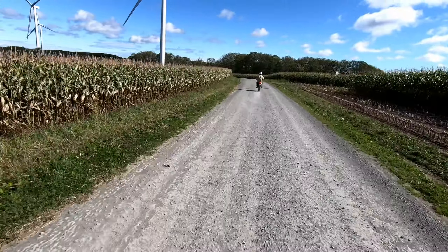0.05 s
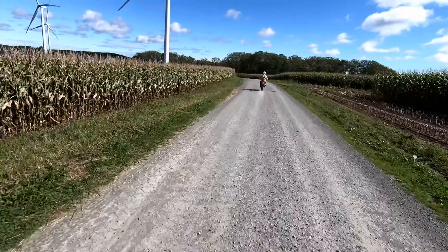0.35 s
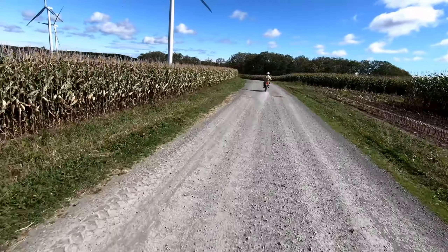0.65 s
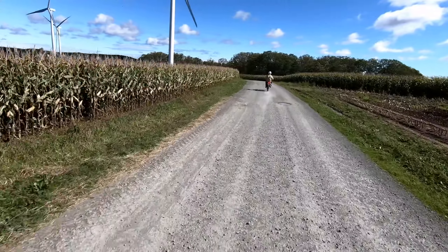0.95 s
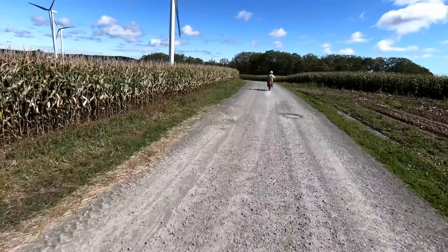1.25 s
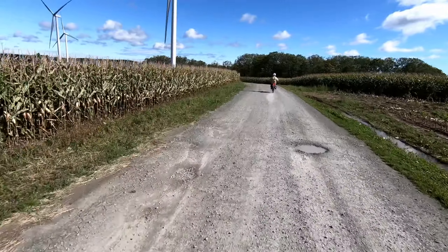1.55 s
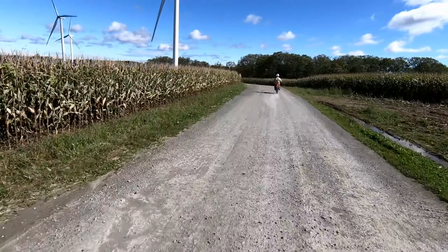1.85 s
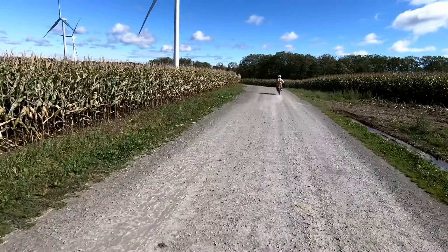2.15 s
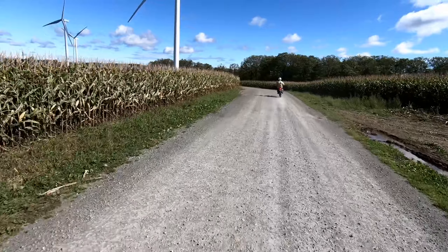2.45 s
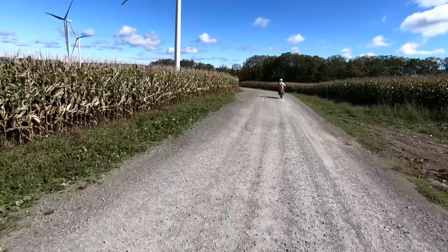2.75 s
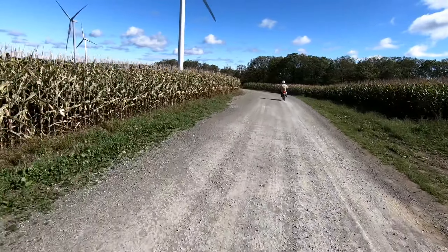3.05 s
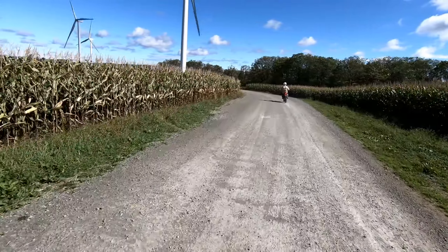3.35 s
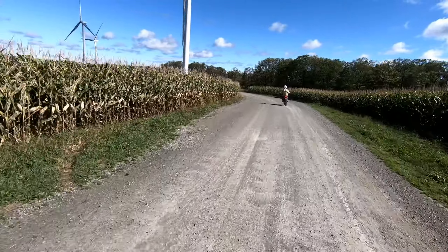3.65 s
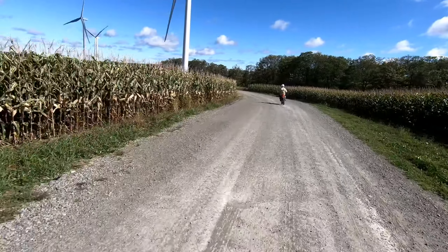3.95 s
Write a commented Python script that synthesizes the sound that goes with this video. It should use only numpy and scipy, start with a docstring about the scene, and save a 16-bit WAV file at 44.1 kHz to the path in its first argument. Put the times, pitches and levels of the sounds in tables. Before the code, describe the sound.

Wind rumbles and flutters on the microphone for all four seconds of a two-wheeler ride. Short rasping gusts and faint scratchy hisses crowd the first 1.3 seconds, then thin out. Underneath, tyres hum and crunch over gravel, softer after 3 seconds, and a faint drive whir sinks slightly in pitch. Loose parts knock briefly at about 1.2 seconds, twice around 2, and at 3.8.

```python
"""Wind rumbles and flutters on the microphone during a two-wheeler ride along a gravel road.
Big swirls of air make the rumble; small ones (eddies) rasp briefly and thin out as the wind eases.
Underneath, the tyres hum and hiss over the gravel, bumps make loose parts knock and the drive
whirs faintly. Faint, short bursts of scratchy hiss come and go."""
import sys
import numpy as np
from scipy import signal
from scipy.fft import rfft, irfft
from scipy.io import wavfile
from scipy.ndimage import uniform_filter1d, minimum_filter1d

SR = 44100
rng = np.random.default_rng(int(sys.argv[2]) if len(sys.argv) > 2 else 0)


def unload_wav(signal):
    """Save mono or channel-first audio to the path in sys.argv[1] as 16-bit WAV at rate SR, clipped to [-1, 1]."""
    wavfile.write(
        sys.argv[1],
        SR,
        np.round(np.clip(np.atleast_2d(signal).T, -1, 1) * 32767).astype(np.int16),
    )


N = 176400
T = np.arange(N) / SR


# How the deep rumble, low buffeting and higher flutter rise and fall (time [s], level [dB])
RUMBLE_LEVELS = [(0.0, -24.5), (0.12, -18.5), (1.36, -20.5), (1.38, -13), (1.48, -30.5), (1.53, -25),
                 (2.12, -22), (2.24, -20.5), (2.9, -24.5), (3.12, -19), (3.82, -22.5), (3.89, -26),
                 (4.0, -18)]
BUFFET_LEVELS = [(0.0, -27), (0.15, -20), (0.73, -23.5), (1.63, -26), (1.69, -32), (1.73, -23),
                 (1.86, -19.5), (1.89, -36.5), (1.93, -20.5), (2.36, -25), (2.39, -20.5), (3.17, -30.5),
                 (3.22, -24), (3.88, -21.5), (3.9, -34), (4.0, -19.5)]
FLUTTER_LEVELS = [(0.0, -17.5), (0.03, -19), (1.27, -21.5), (1.34, -17.5), (1.51, -27), (1.6, -20),
                  (1.64, -25.5), (2.05, -21.5), (3.46, -25.5), (3.5, -33.5), (3.61, -23.5), (3.81, -28.5),
                  (3.83, -28.5), (4.0, -34)]
# Their tone, from low to high (frequency [Hz], level [dB])
RUMBLE_TONE = [(10, -26.5), (22, -6.5), (42, -3), (62, -3), (90, -6), (140, -19.5), (300, -53.5)]
BUFFET_TONE = [(50, -19), (85, -8.5), (120, 0.5), (150, 1.5), (185, -4), (230, -13), (400, -37.5),
               (900, -68)]
FLUTTER_TONE = [(90, -24), (170, -5), (220, -1.5), (285, 0.5), (340, -6.5), (450, -16.5), (700, -30),
                (1500, -62.5)]

def big_swirls():
    """Big swirls of air press on the microphone: rumble, buffeting and flutter."""
    rumble = steady(colour(noise(), RUMBLE_TONE), span_s=0.17, share=0.96)
    rumble *= undb(curve(RUMBLE_LEVELS) + 1)
    buffet = steady(colour(noise(), BUFFET_TONE), span_s=0.12, share=0.7)
    buffet *= undb(curve(BUFFET_LEVELS) + 0.5)
    flutter = steady(colour(noise(), FLUTTER_TONE), span_s=0.084, share=1)
    flutter *= undb(curve(FLUTTER_LEVELS) - 0.5 + 1.2 * wander(21))
    return rumble + buffet + flutter


# Eddies hitting the microphone
# (time [s], length [s], thud level [dB], rasp level [dB], rasp pitch [Hz])
EDDY_HITS = [(0.018, 0.0081, -27, -33.5, 1680), (0.042, 0.0023, -28, -36, 2480),
             (0.083, 0.011, -31, -33.5, 1990), (0.106, 0.0047, -27, -33, 1210),
             (0.137, 0.012, -27, -33.5, 1230), (0.148, 0.0071, -19.5, -31, 3250),
             (0.18, 0.0059, -24.5, -33, 3100), (0.197, 0.0034, -39, -32, 2350),
             (0.222, 0.0081, -34.0, -34.5, 2540), (0.241, 0.0043, -41, -33.5, 2680),
             (0.283, 0.0028, -26, -43, 1730), (0.302, 0.038, -30.5, -42, 2380),
             (0.327, 0.01, -27, -34, 2670), (0.336, 0.006, -32, -31.5, 2470),
             (0.368, 0.004, -30, -32, 2940), (0.385, 0.0035, -31, -36, 1550),
             (0.466, 0.0026, -26, -29, 1240), (0.505, 0.016, -26, -31, 2360),
             (0.532, 0.017, -39, -52.5, 1280), (0.57, 0.011, -27, -33.5, 2340),
             (0.608, 0.0075, -31, -39, 1660), (0.639, 0.013, -22.5, -31.5, 2570),
             (0.654, 0.0054, -32, -33, 1240), (0.669, 0.021, -32, -36.5, 2330),
             (0.699, 0.0044, -33, -39, 1720), (0.756, 0.009, -31.0, -30, 2720),
             (0.772, 0.0057, -19, -34, 2070), (0.797, 0.0062, -31, -34.5, 1910),
             (0.817, 0.007, -18, -31, 1210), (0.839, 0.007, -32, -30.5, 1250),
             (0.91, 0.0069, -23, -40, 2210), (0.943, 0.015, -24.5, -37.5, 1870),
             (0.959, 0.012, -30.5, -30.5, 2090), (0.973, 0.0044, -23, -31.5, 1210),
             (0.987, 0.0061, -29, -33, 1960), (1.017, 0.013, -29, -32.5, 2170),
             (1.051, 0.01, -35, -38, 2290), (1.094, 0.017, -36, -38, 2580),
             (1.148, 0.014, -26.5, -34.5, 1820), (1.176, 0.0095, -24.5, -36.5, 1830),
             (1.237, 0.007, -26, -31.5, 2270), (1.253, 0.005, -24, -32, 1210),
             (1.284, 0.02, -33, -40.5, 1610), (1.303, 0.006, -26.5, -43.5, 3070),
             (1.361, 0.008, -32, -38, 2000), (1.485, 0.017, -27, -39, 1890),
             (1.538, 0.0056, -42, -40, 1920), (1.616, 0.013, -32, -43, 2260),
             (1.705, 0.0069, -27.5, -40.5, 1930), (1.813, 0.014, -42, -38.5, 1480),
             (1.844, 0.005, -35, -38, 1860), (1.932, 0.0062, -29, -37, 1880),
             (1.946, 0.0062, -29, -37, 1910), (2.089, 0.0041, -36, -35.5, 1690),
             (2.151, 0.005, -24.5, -39, 1730), (2.186, 0.0075, -27, -46, 1210),
             (2.27, 0.0041, -34, -41.5, 1550), (2.313, 0.005, -25, -44, 1560),
             (2.436, 0.005, -28, -48.5, 1390), (2.644, 0.005, -31, -34.5, 1600),
             (2.666, 0.0036, -35, -44, 2950), (2.717, 0.0044, -26, -38, 2300),
             (2.781, 0.009, -34, -41.5, 1520), (3.253, 0.014, -30.5, -45, 1380),
             (3.611, 0.005, -28.5, -43, 1720), (3.651, 0.0067, -33, -39.5, 1270)]
# Tone of the dull thud and of the tearing air (frequency [Hz], level [dB])
THUD_TONE = [(200, -31), (420, 15.5), (750, 9), (1200, -4.5), (1800, -25), (3500, -43)]
TEARING_TONE = [(700, -3), (1400, 6.5), (2000, 6), (2800, 4), (3600, -8.5), (4800, -13), (6000, -42.5)]
# How the microphone's opening muffles the rasp (frequency [Hz], level [dB])
OPENING_TONE = [(500, 5), (3400, 1.5), (4600, -8), (6200, -20)]

def eddies(size=8192):
    """Each eddy tears at the microphone's opening: a thud and a pitched rasp, then a ragged wake."""
    attack_s, decay_s, wake_decay_s = 0.004, 0.0035, 0.016
    thud_gain, tearing_gain, rasp = np.zeros((3, N))
    air = grainy_noise(depth_db=2.5, rate=520)
    wake_db = -8.5 + 4 * np.tanh(wander(110))
    for start, length_s, thud_db, rasp_db, pitch_hz in EDDY_HITS:
        first = max(int((start - attack_s) * SR), 0)
        part = slice(first, first + size)
        age = T[part] - start
        since_end = np.maximum(age - length_s, 0)
        rise = np.clip(age / attack_s + 0.5, 0, 1)
        wake = undb(wake_db[part]) * np.exp(-since_end / wake_decay_s)
        shape = rise * np.maximum(np.exp(-since_end / decay_s), wake)
        ring = resonance(rng.standard_normal(size), pitch_hz, width_hz=0.27 * pitch_hz)
        ring = steady(ring, span_s=0.0059, share=1)
        thud_gain[part] = np.maximum(thud_gain[part], undb(thud_db) * shape)
        tearing_gain[part] = np.maximum(tearing_gain[part], undb(rasp_db - 5.5) * shape)
        rasp[part] += undb(rasp_db) * shape * ring[:len(age)]
    thud = steady(colour(air, THUD_TONE), span_s=0.016, share=0.72) * thud_gain * undb(1)
    tearing = colour(air * tearing_gain, TEARING_TONE)
    return thud + tearing + colour(rasp, OPENING_TONE) * undb(-9)


# Strength of the gusts (time [s], level [dB])
GUST_LEVELS = [(0, -25.5), (.38, -29.5), (.45, -33.5), (.8, -29.5), (1.05, -33), (1.27, -28.5), (1.55, -38),
               (2.05, -39.5), (2.2, -32), (2.45, -37.5), (2.6, -40), (3.0, -43.5), (4, -46.5)]
# Their hollow tone (frequency [Hz], level [dB])
GUST_TONE = [(250, -18), (340, 3.5), (440, 4), (600, -5.5), (900, -27.5)]

def gusts():
    """Strong gusts blow hollowly across the microphone's opening in quick surges."""
    hollow = steady(colour(noise(), GUST_TONE), span_s=0.033, share=0.96)
    return hollow * undb(curve(GUST_LEVELS) + 0.73 * wander(30))


# Strength of the wind (time [s], level [dB])
WIND_LEVELS = [(0, -28.5), (.3, -29.5), (.44, -31), (.72, -31), (.95, -33.5), (1.3, -30.5), (1.55, -35.5),
               (2.2, -33), (2.7, -31.5), (3.1, -37.5), (3.3, -35.5), (3.5, -36.5), (4, -38.5)]
# Tone of the rushing air (frequency [Hz], level [dB])
RUSH_TONE = [(200, -33.5), (400, 2), (650, 4), (1000, -4.5), (1500, -17), (2500, -22), (4000, -24.5),
             (6000, -56.5)]

def airstream(swirl):
    """Air rushes by in puffs as the swirls' pressure peaks; a bright hiss grows faster than the wind."""
    wind_db = curve(WIND_LEVELS)
    puffs = np.tanh(unit(swirl))
    rush = unit(grainy_noise(depth_db=1, rate=520) * undb(3 * puffs))
    rush = colour(rush, RUSH_TONE) * undb(wind_db - 4.5 + 2 * wander(34))
    hiss = unit(grainy_noise(depth_db=3, rate=520) * undb(5.5 * puffs))
    hiss_db = -40.5 + 3.4 * (wind_db + 28.5)  # 3.4 dB more for each dB of wind
    return rush + colour(hiss, TEARING_TONE) * undb(hiss_db + 2 * wander(29))


# Hum of the tyre tread (time [s], pitch [Hz], level [dB])
TREAD_HUM = [(0, 119, -25), (1.1, 117.6, -34), (1.3, 117.1, -18.5), (1.65, 115, -26.5), (2.2, 114.2, -36.5),
             (2.8, 109.2, -25), (3.15, 108.7, -25.5), (3.6, 107.2, -22.5), (4, 108, -25.5)]

def tyre_hum():
    """The tread drums on the uneven road, its pitch sinking as the ride slows."""
    pitch_hz = curve(TREAD_HUM) * (1 + 0.019 * wander(13.2))
    phase = 2 * np.pi * np.cumsum(pitch_hz) / SR
    tone = np.sin(phase) + undb(-9.5) * np.sin(2 * phase)
    return unit(tone * undb(1.9 * wander(31))) * undb(curve(TREAD_HUM, column=2))


# Loudness of the gravel and the fine grit (time [s], level [dB])
GRAVEL_LEVELS = [(0, -40), (1.3, -40), (1.7, -41.5), (2.7, -42), (3.1, -44.5), (3.5, -47), (4, -46)]
GRIT_LEVELS = [(0, -55), (.6, -55.5), (1.3, -60), (1.9, -59.5), (2.7, -59), (3.05, -69.5), (3.55, -69.5),
               (4, -64.5)]
# Their tone (frequency [Hz], level [dB])
GRAVEL_TONE = [(300, -11), (600, 0), (900, 5.5), (1300, 1.5), (1900, -2), (2300, -6.5), (3400, -10.5),
               (4400, -14), (5100, -30.5), (6000, -58)]
GRIT_TONE = [(2600, -7.5), (3600, -5), (4500, -1.5), (5100, -3), (5700, -28.5)]

def gravel():
    """Countless small grains crunch under the tyres, and fine grit hisses above them."""
    crunch = colour(grainy_noise(depth_db=4, rate=1300), GRAVEL_TONE)
    grit = colour(grainy_noise(depth_db=4, rate=900), GRIT_TONE)
    return crunch * undb(curve(GRAVEL_LEVELS) + 1.1 * wander(12)) + grit * undb(curve(GRIT_LEVELS))


# Tone of the pebble clicks (frequency [Hz], level [dB])
PEBBLE_TONE = [(700, -9), (1100, 1), (1700, 0), (2600, -4.5), (3600, -8.5), (4600, -20), (5600, -48)]

def pebbles(hits_per_s=90, decay_s=0.003):
    """Small pebbles clatter at random under the tyres, 9 dB quieter than the gravel."""
    hits = (rng.random(N) < hits_per_s / SR) * undb(3 * np.clip(noise(), -2, 2))
    shape = signal.lfilter([1], [1, -np.exp(-1 / (decay_s * SR))], hits)  # each hit dies away
    return unit(colour(noise() * shape, PEBBLE_TONE)) * undb(curve(GRAVEL_LEVELS) - 9)


# Knocks of loose parts on the two-wheeler (time [s], pitch [Hz], level [dB])
PART_KNOCKS = [(1.181, 1570, -24), (1.995, 1814, -22.5), (2.022, 1850, -23.5), (3.831, 1163, -23.5)]

def knocks(contact_s=0.0013, ring_s=0.027):
    """Bumps make loose parts knock and ring briefly."""
    out = np.zeros(N)
    for start, pitch_hz, db in PART_KNOCKS:
        age = np.maximum(T - start, 0)
        phase = 2 * np.pi * pitch_hz * np.cumsum(1 + 0.04 * wander(300)) / SR
        ring = unit(np.sin(phase) + undb(-11) * np.sin(1.25 * phase))
        rise = 1 - np.exp(-(age / contact_s) ** 2)
        out += undb(db - 60 * age / ring_s) * rise * ring
    return out


# Upper whir of the drive (time [s], pitch [Hz], level [dB])
DRIVE_WHIR = [(0, 2200, -60), (.85, 2120, -52), (1, 2080, -42.5), (1.4, 2014, -50.5), (1.6, 1936, -53),
              (2, 1888, -54.5), (2.8, 1850, -53.5), (4, 1821, -59.5)]

def drive():
    """The drive whirs roughly: the upper pitch sinks with the speed, a lower one stays put."""
    phase = 2 * np.pi * np.cumsum(curve(DRIVE_WHIR)) / SR
    upper = unit(wander(150) * np.cos(phase) + wander(150) * np.sin(phase))  # a pitch blurred to noise
    lower = unit(resonance(noise(), centre_hz=1560, width_hz=400))
    return upper * undb(curve(DRIVE_WHIR, column=2)) + lower * undb(-49.5)


# Short bursts of hiss (time [s], length [s], relative level [dB])
HISS_BURSTS = [(0.013, 0.044, -34), (0.094, 0.023, -34), (0.14, .03, -34), (0.191, .04, -32.5),
               (0.255, 0.069, -37.5), (0.326, 0.12, -32.5), (0.491, 0.051, -35.5), (0.545, 0.095, -37),
               (0.631, 0.054, -35), (.785, 0.025, -34), (0.852, 0.043, -38), (0.943, .03, -36),
               (0.983, 0.039, -38), (1.04, .05, -38.5), (1.173, .025, -40), (1.434, .025, -36.5),
               (1.482, 0.056, -37), (1.543, 0.11, -40.5), (1.662, 0.079, -38), (1.787, 0.049, -37.5),
               (1.847, 0.055, -38.5), (2.193, .035, -38), (2.244, .025, -37), (2.505, .025, -37),
               (2.583, 0.03, -38), (2.67, .02, -40), (2.714, 0.032, -37), (2.938, 0.028, -39),
               (3.549, 0.028, -41.5), (3.825, 0.033, -41), (3.87, 0.048, -40.5), (3.943, 0.05, -44)]
# Their scratchy tone (frequency [Hz], level [dB])
HISS_BURST_TONE = [(800, -0.5), (2000, 1), (4200, -4), (6000, -14), (7600, -9.5), (9000, -28.5)]

def hiss_bursts(attack_s=0.0048, decay_s=0.0036):
    """Faint, short bursts of scratchy hiss start and stop quickly."""
    shape = np.zeros(N)
    for start, length_s, db in HISS_BURSTS:
        rise = np.clip((T - start) / attack_s, 0, 1)
        fall = np.exp(-np.maximum(T - start - length_s, 0) / decay_s)
        shape += undb(db) * rise * fall
    return undb(-15) * colour(unit(noise()) * shape, HISS_BURST_TONE)


def undb(db):
    """Turn decibels into a number to multiply by."""
    return 10 ** (np.asarray(db) / 20)


def unit(x):
    """Scale a sound to an average power of 1."""
    return x / np.sqrt(np.mean(x ** 2) + 1e-18)


def curve(table, column=1):
    """One column of a table, joined by straight lines in time."""
    rows = np.array(table, float)
    return np.interp(T, rows[:, 0], rows[:, column])


def noise():
    """White noise: a plain, even hiss."""
    return rng.standard_normal(N)


def wander(rate):
    """Smooth random motion of about 1 either way, up to about rate changes a second."""
    hz = np.arange(N // 2 + 1) * SR / N
    return unit(irfft(rfft(noise()) * np.exp(-(hz / rate) ** 2), N))


def grainy_noise(depth_db, rate):
    """Noise whose level flickers so fast that it breaks into grains."""
    return unit(noise() * undb(depth_db * wander(rate)))


def colour(x, tone):
    """Shape a sound's lows and highs with a tone table; white noise keeps its power."""
    table_hz, table_db = np.array(tone, float).T
    hz = np.arange(N // 2 + 1) * SR / N + 1e-3
    gain = undb(np.interp(np.log(hz), np.log(table_hz), table_db))
    edge_fade = np.minimum(1, table_hz[-1] / hz) ** 2 * np.minimum(1, hz / table_hz[0]) ** 2
    return irfft(rfft(x) * unit(gain * edge_fade), N)


def resonance(x, centre_hz, width_hz):
    """Keep the part of a sound near one pitch."""
    hz = np.arange(len(x) // 2 + 1) * SR / len(x)
    return irfft(rfft(x) / (1 + ((hz - centre_hz) / width_hz * 2) ** 2), len(x))


def steady(x, span_s, share):
    """Take a share of the swells slower than span_s out of a noise."""
    power = np.maximum(uniform_filter1d(x ** 2, int(span_s * SR)), 1e-12)
    return unit(x / power ** (share / 2))


def pan(x, db):
    """Place a sound in stereo by its left minus right level."""
    return x * undb(np.array([[db], [-db]]) / 2)


def scene():
    """Wind on the microphone over the sounds of the ride, almost the same in both ears."""
    swirl = big_swirls()
    wind = pan(airstream(swirl) + eddies(), db=-0.9)
    ride = pan(gravel() + pebbles() + hiss_bursts() + knocks() + drive(), db=-1.3)
    ride += 0.08 * gravel() * np.array([[1], [-1]])  # opposite in each ear, for a little width
    return swirl + gusts() + tyre_hum() + wind + ride


def record(dry, ceiling=0.574, size=221):
    """A limiter smoothly holds down the tallest peaks; the treble above 8200 Hz is cut."""
    needed_gain = np.minimum(1, ceiling / (np.abs(dry).max(axis=0) + 1e-9))
    held_gain = minimum_filter1d(needed_gain, 2 * size)
    smooth_gain = uniform_filter1d(uniform_filter1d(held_gain, size), size)
    treble_cut = signal.ellip(8, 0.2, 70, 8200, fs=SR, output="sos")
    return signal.sosfilt(treble_cut, dry * smooth_gain)


dry = scene()
out = record(dry)
unload_wav(out)
```